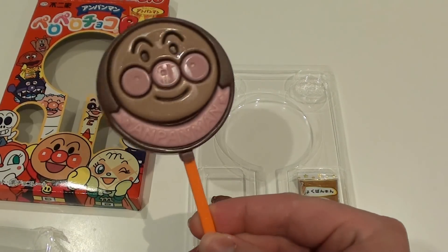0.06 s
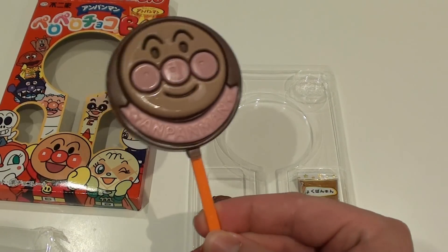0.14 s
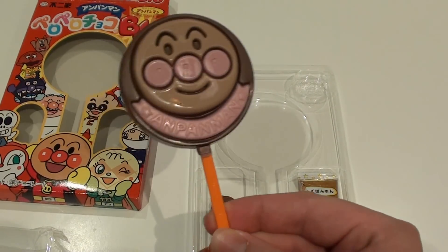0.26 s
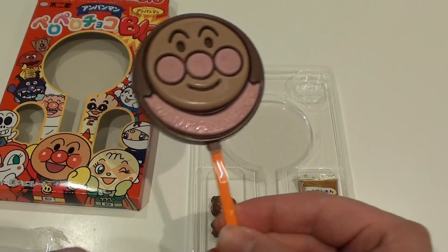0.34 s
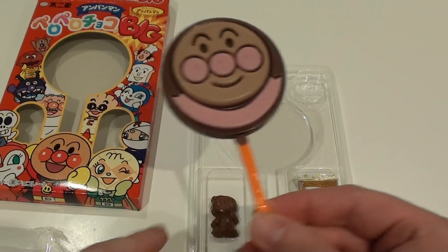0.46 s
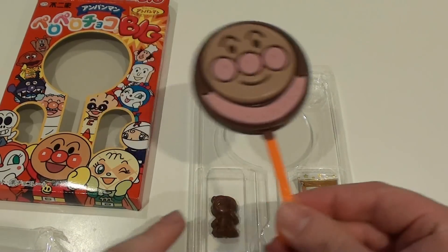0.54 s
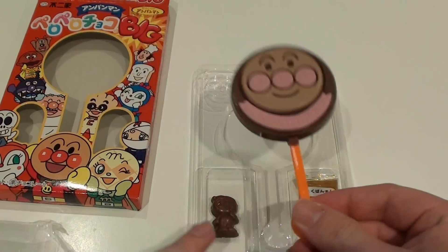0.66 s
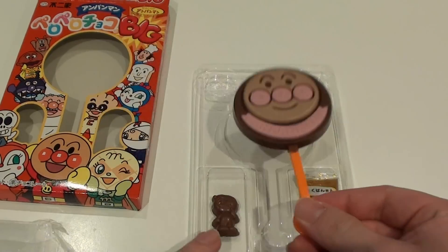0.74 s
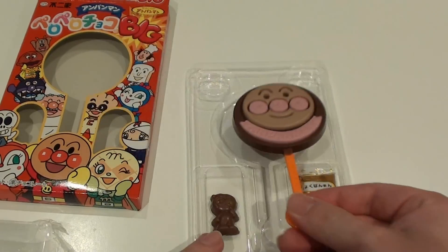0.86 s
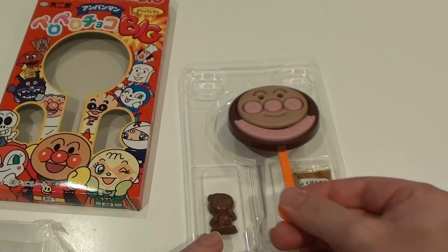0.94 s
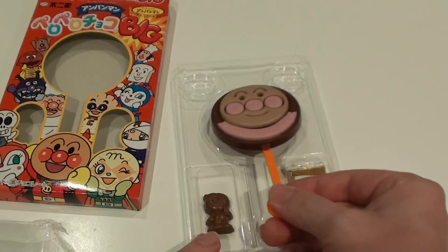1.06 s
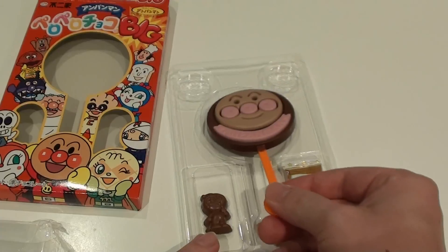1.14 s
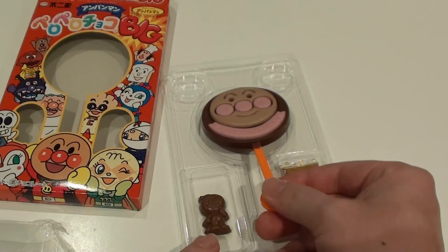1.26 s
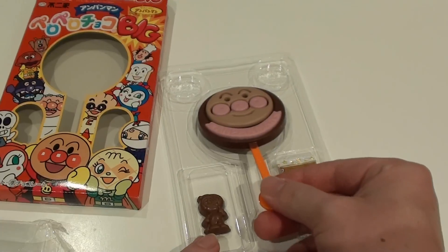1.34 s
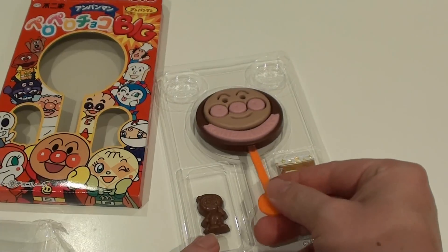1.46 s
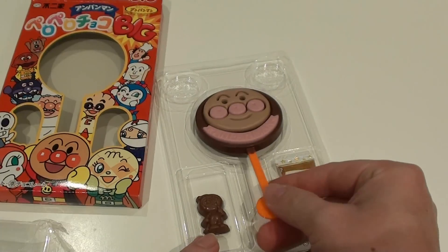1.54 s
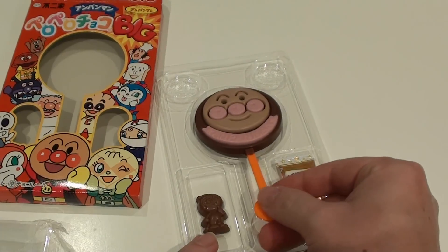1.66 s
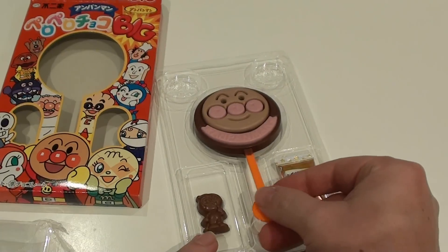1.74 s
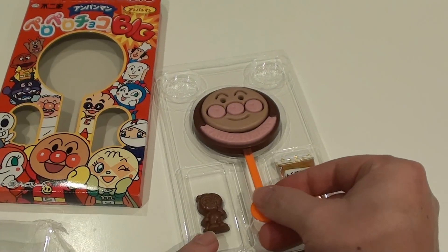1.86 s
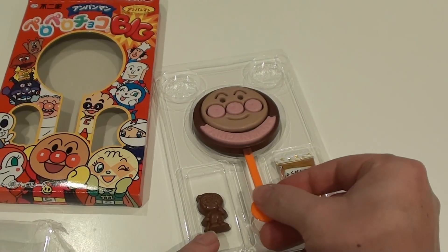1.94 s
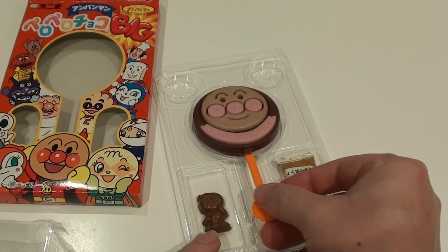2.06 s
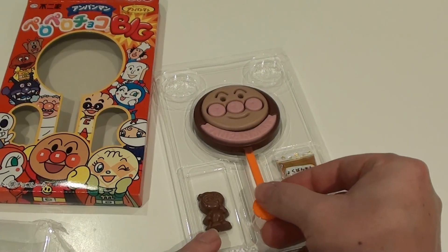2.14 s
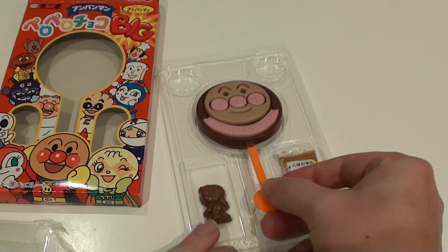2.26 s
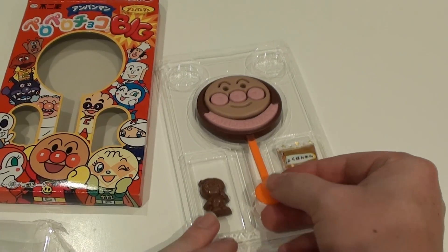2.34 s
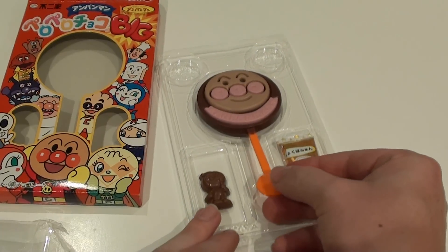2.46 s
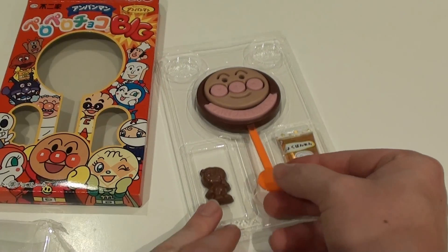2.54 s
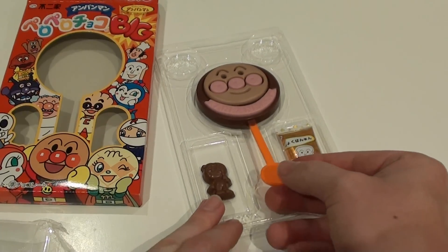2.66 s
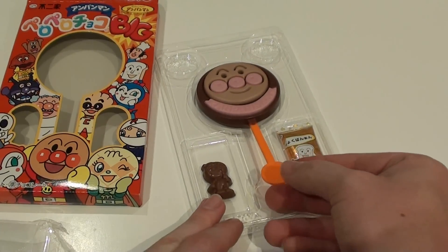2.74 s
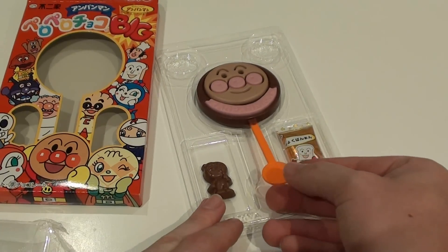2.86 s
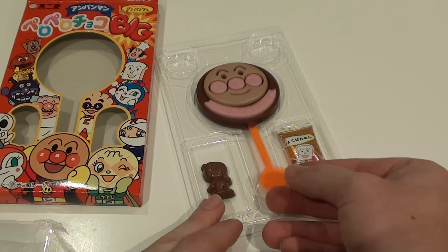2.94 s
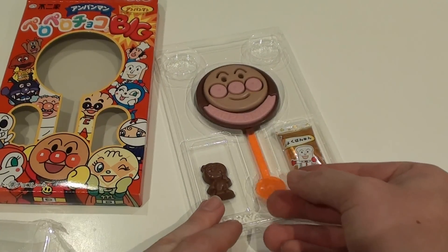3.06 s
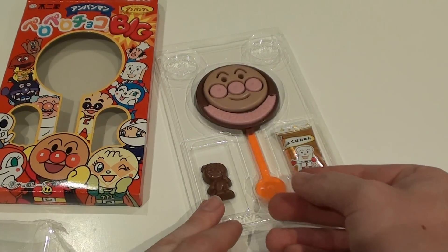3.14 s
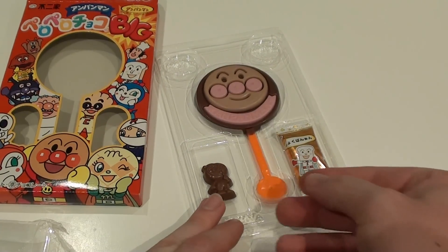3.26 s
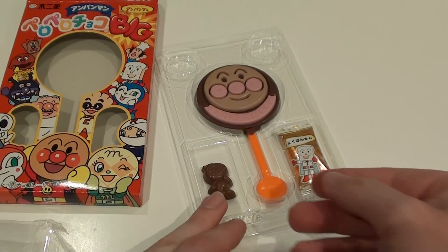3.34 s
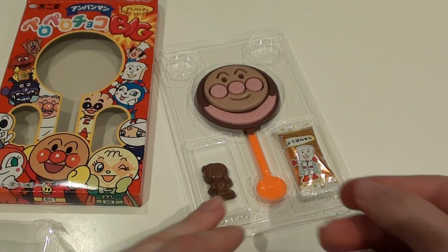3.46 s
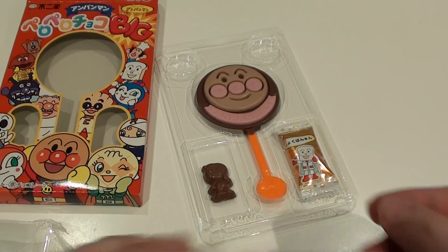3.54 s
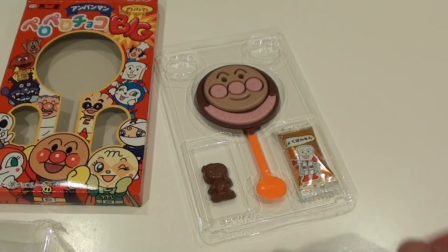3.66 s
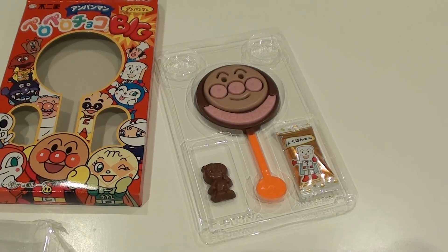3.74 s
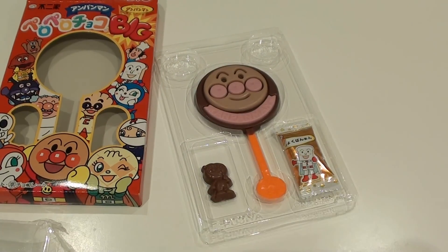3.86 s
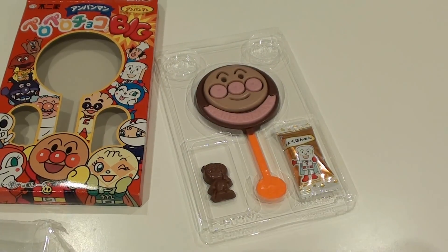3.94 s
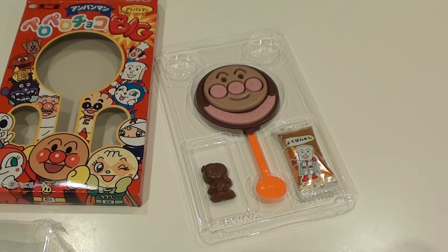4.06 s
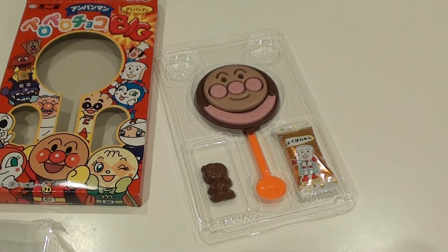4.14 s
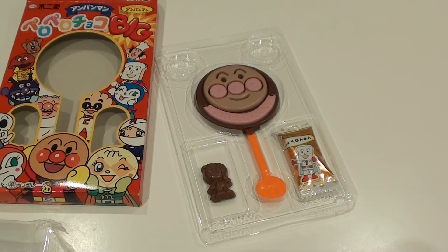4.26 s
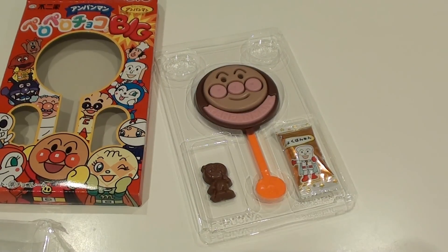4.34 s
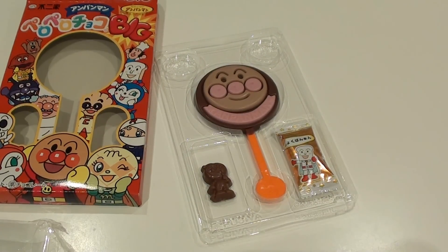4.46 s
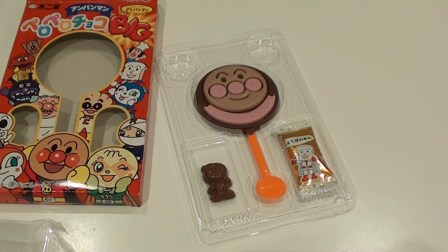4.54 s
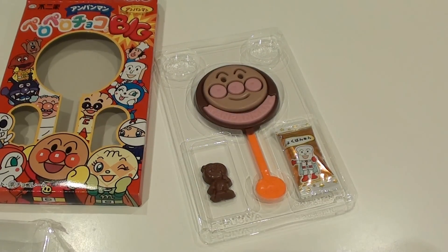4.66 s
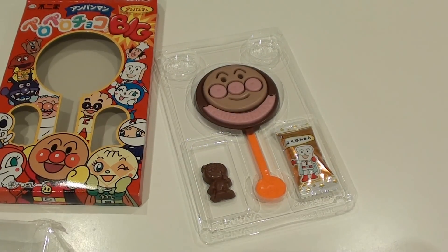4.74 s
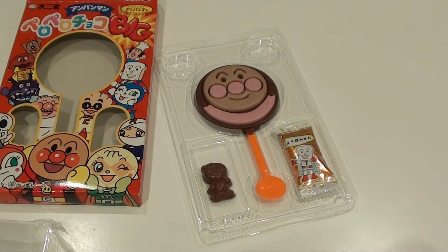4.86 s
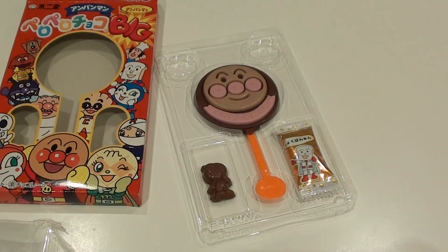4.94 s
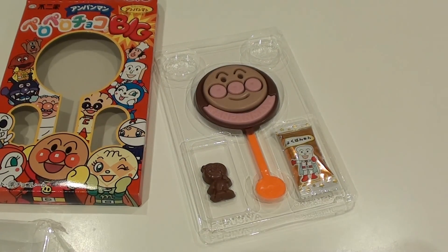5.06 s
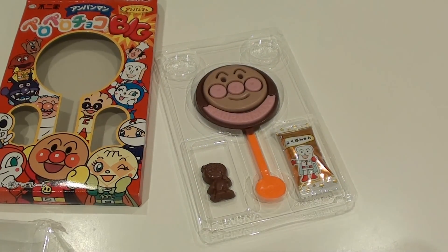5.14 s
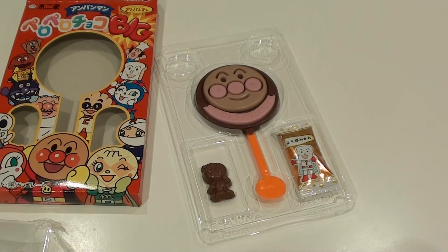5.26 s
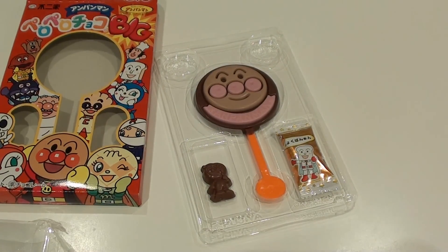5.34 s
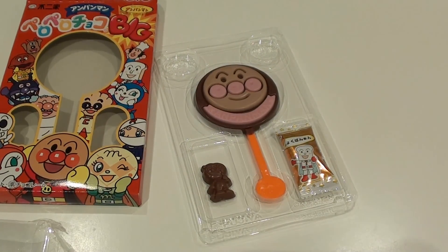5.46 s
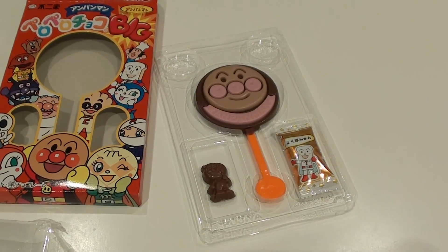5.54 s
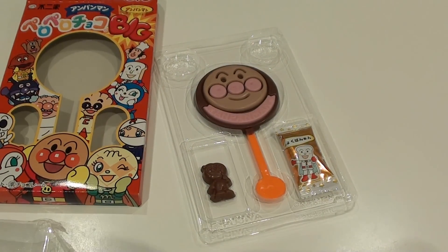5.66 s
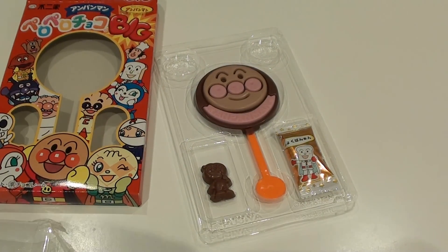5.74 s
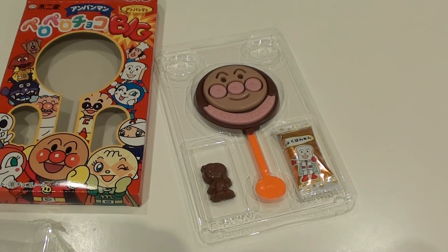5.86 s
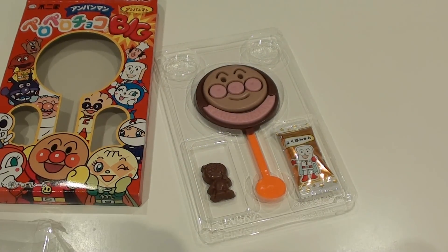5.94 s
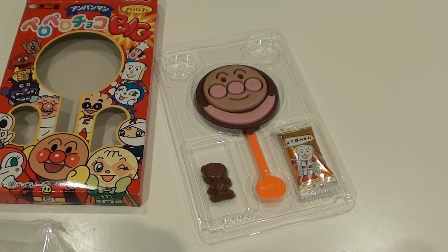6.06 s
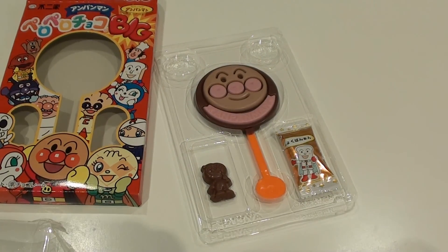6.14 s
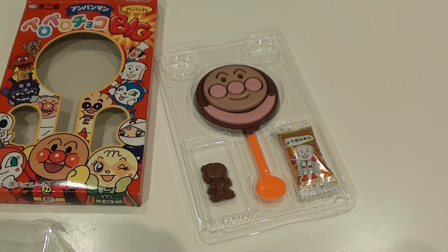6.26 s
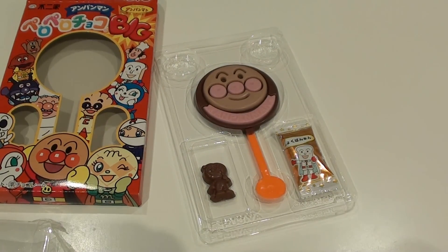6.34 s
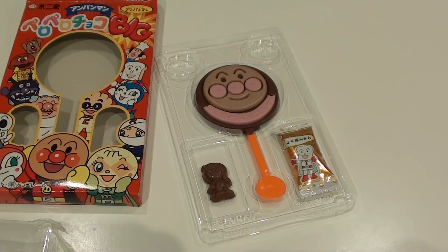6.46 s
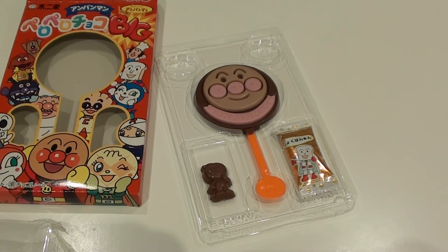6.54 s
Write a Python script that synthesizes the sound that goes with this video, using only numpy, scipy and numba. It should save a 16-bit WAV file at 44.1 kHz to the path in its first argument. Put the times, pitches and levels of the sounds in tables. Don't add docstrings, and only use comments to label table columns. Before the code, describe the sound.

A quiet, fairly dry room with low rumble, soft hiss and faint electronic whine, heard close in stereo. Nothing else until about 0.8 s, when light plastic ticks begin. From 1.0 to 1.55 s a lollipop settles into a thin tray: a dense flurry of hollow taps, bright crinkles, a crisp dimple pop near 1.06 and soft table bumps. Sparse taps and creaks continue to 2.2, with a sharper tick at 1.8. From 2.3 to 2.85 the tray rasps drily across the table. After a brief lull, the stick snaps into its groove at 3.1, loud and hard, with a hollow thud and a plastic rattle dying by about 3.5. A dull soft bump comes at 4.05, with faint cloth brushing until 4.7, strongest near 4.6. Then mostly hiss, with tiny ticks and two small hard knocks at 6.12 and 6.47, the second stronger.

```python
import sys
import numpy as np
from scipy import signal
from scipy.fft import rfft, irfft
from scipy.io import wavfile
from scipy.ndimage import uniform_filter1d
from numba import njit

SR = 44100
rng = np.random.default_rng(int(sys.argv[2]) if len(sys.argv) > 2 else 0)


def master(y):
    cut = np.clip(np.atleast_2d(y).T, -1, 1)
    pcm = np.round(cut * 32767)
    wavfile.write(sys.argv[1], SR, pcm.astype(np.int16))


def nominal_scale(level):
    x = np.asarray(level, float) / 20
    return 10 ** x


N = 291060

# hz, level_db_per_hz
AIR = [(15, -42), (25, -16.5), (70, -7), (82, -10.5), (102, 1), (127, -9.5), (153, -2), (293, -2.5),
       (317, -6), (659, -7.5), (1160, -10), (3820, -14), (4610, -14), (14800, -17), (15900, -18)]
# hz, side_minus_mid_db
AIR_SIDE = [(60, -17.5), (110, -15.5), (200, -13), (380, -1), (700, 0), (1290, 0.5), (2380, -11),
            (4400, -4.5), (8120, -9), (15000, -18.5)]
# hz, width_hz, level_db
WHINE = [(100, 27, -74.5), (4560, 380, -72), (5450, 300, -72), (6900, 250, -77), (7430, 250, -76)]
# time_s, level_db
HUSH = [(0, -58), (.6, -57.5), (1.5, -55), (3, -55), (3.8, -55.5), (5, -56), (6.6, -58)]
# hz, level_db, t60_s
BLOCK = [(1094, -0.5, 0.063), (1060, -18.5, 0.05), (1690, -10, 0.016), (2150, -12.5, 0.044),
         (2280, -14, 0.044), (2770, -4.5, 0.05), (3350, 1.5, 0.015), (3550, 6.5, 0.012), (3430, -16, 0.066),
         (3730, -25, 0.16), (4190, -22.5, .009), (4390, 4.5, 0.013), (4860, -8, 0.0099), (5270, -11, 0.016),
         (5770, 2.5, 0.0068), (6060, -3, 0.0081), (6800, -12, .015), (7900, -2.5, 0.0084),
         (10040, -18, 0.0063)]
# start_s, blow_db, bright_db_per_oct, ring_time_share, pitch_stretch
KNOCKS = [
    (6.121, -54, 2.5, .3, 1.2),
    (6.1229, -40.5, -4, 0.64, 1.03),
    (6.469, -31, 2, 0.91, 1.001),
]
# start_s, peak_db, pitch_hz, t60_s
BUMPS = [(1.035, -39.5, 189, 0.11), (1.149, -36, 186, 0.13), (1.84, -46, 178, 0.16),
         (1.239, -34.5, 190, 0.098), (1.24, -40.5, 480, .05), (1.263, -36.5, 275, 0.06),
         (1.315, -37.5, 207, 0.081), (1.35, -39, 205, 0.083), (1.40, -43, 195, .1), (1.625, -41, 186, 0.15),
         (3.405, -37, 195, 0.091), (4.047, -38, 290, 0.021), (4.0485, -42, 2400, .005),
         (4.048, -21, 480, 0.0055), (4.049, -19, 840, 0.0063), (4.0485, -31.5, 1670, 0.006),
         (4.74, -39, 300, 0.025)]
# time_s, level_db, dull_rel_db
SLEEVE = [
    (3.6, -85, 1),
    (4.024, -66.5, -1.5),
    (4.152, -63.5, 3.5),
    (4.41, -61.5, -2),
    (4.566, -54.5, -9),
    (4.628, -56, -11),
    (4.702, -76, -3),
    (5.0, -77, -4),
]
# hz, level_db, t60_s
CUP = [(186, -10.5, 0.24), (208, -30.5, 0.51), (254, -23, 0.14), (295, -19, 0.039), (347, -38.5, 0.53),
       (431, -34, 0.23), (494, -20.5, 0.16), (585, -12.5, 0.028), (670, -29, 0.097), (678, -28, 0.18),
       (775, -14, 0.09), (814, -15, 0.12), (860, -28, 0.15), (949, -3.5, 0.075), (990, -27, 0.37),
       (1027, -26, 0.4), (1025, -36, 0.16), (1156, -24.5, 0.18), (1060, -21, 0.095), (1225, -28, 0.21),
       (1337, -29, 0.26), (1400, -28.5, 0.14), (1535, -22.5, 0.26), (1567, -25, 0.25), (1600, -15, 0.0244),
       (1700, -31, 0.17), (2200, -16.5, 0.034), (1940, -47.5, .3)]
# start_s, blow_db, contact_ms, ring_time_share (fingers damp the rest)
SNAP = [
    (3.0991, -13, 0.057, 0.05),
    (3.1021, 7, 0.054, 0.017),
    (3.1042, -0.5, 0.21, 0.93),
]
# hz, width_hz, level_db, t60_s
SHIVER = [(198, 46, -37, 0.3), (352, 160, -28, 0.36), (780, 320, -27, 0.45), (1250, 730, -27.5, 0.54),
          (1950, 290, -32.5, 0.44), (4130, 2200, -40.5, 0.43), (7000, 3300, -44, 0.3)]
# hz, width_hz, level_db
TRAY = [(1250, 590, 1), (1850, 435, 2), (2400, 470, -1.5), (3190, 360, -9.5), (4100, 750, -18)]
EDGE = [(4250, 540, -18), (6250, 1600, 3.5), (7820, 1500, 2.5), (9200, 2800, -5), (11500, 2600, -19)]
TABLE = [(300, 41, 2), (520, 430, -3)]
# hz, width_hz, level_db
RASP = [(4170, 1000, 1.5), (6080, 870, 1), (7350, 1100, 0), (8480, 1300, -3.5), (10350, 2500, -11.5),
        (12800, 2500, -21)]
BODY_HZ = np.array([930, 1140, 1240, 1350, 1460, 1560, 1750, 1850, 1970, 2250, 2550, 3200])
EDGE_HZ = np.array([3400, 4400, 4900, 5300, 5700, 6200, 6550, 7100, 7700, 8200, 9600, 10400])
# start_s, held_s, level_db, bright_db
PRESSES = [(.82, 0.041, -60, 5), (.865, 0.056, -49.5, -2.5), (.93, 0.051, -53.5, -6),
           (1.001, 0.065, -48, -2), (1.069, 0.055, -48, 2.5), (1.133, 0.0083, -42.5, -6),
           (1.151, 0.005, -38.5, -7), (1.165, 0.044, -45, -5.5), (1.217, 0.0094, -43.5, -9),
           (1.24, 0.011, -39.5, -11), (1.2697, 0.022, -41.5, -4.5), (1.303, 0.019, -40.5, -3.5),
           (1.335, 0.054, -46, -9), (1.408, 0.008, -45.5, -3), (1.421, 0.016, -42.5, -5),
           (1.447, 0.019, -49.5, -20), (1.468, 0.0042, -42, -1.5), (1.484, 0.025, -44.5, -2.5),
           (1.52, 0.026, -46.5, -5), (1.538, 0.0031, -41.5, -2), (1.55, 0.073, -58, -3),
           (1.673, .004, -49.5, -12), (1.804, 0.005, -45, -0.5), (1.862, 0.033, -53, -8),
           (2.036, 0.048, -49.5, -10), (2.096, 0.028, -56, -12), (2.167, 0.066, -53, -12),
           (3.067, 0.0098, -48, -8), (3.0864, 0.019, -38.5, -8), (3.24, .15, -70, -11),
           (3.3, 0.079, -52, -3), (3.402, 0.005, -48.5, -1), ]
# time_s, level_db, bright_db
SLIDE = [(2.25, -62, -11), (2.31, -43.5, -5.5), (2.35, -43, -1.5), (2.41, -40.5, -6.5), (2.48, -44.5, -3.5),
         (2.548, -46, -5.5), (2.65, -46, -5.5), (2.722, -46.5, -6), (2.798, -49.5, -8), (2.868, -65, -10),
         (2.9, -72, -8)]
# start_s, peak_db, pitch_hz, t60_s
TAPS = [(0.802, -46, 2770, 0.019), (0.826, -41, 2800, 0.011), (0.832, -46, 2540, .016),
        (0.8425, -39.5, 2400, 0.018), (0.862, -40, 1210, .025), (0.888, -45, 1550, 0.038),
        (0.905, -43, 1750, .03), (0.9931, -28.5, 2030, .016), (0.998, -40, 3000, .01),
        (1.001, -33, 2380, .015), (1.026, -33, 1880, 0.0099), (1.034, -38, 1500, .02),
        (1.045, -38, 1750, .02), (1.0658, -38, 1700, 0.01), (1.0713, -34, 2470, .012),
        (1.079, -37, 2400, .012), (1.098, -36, 2280, .012), (1.1342, -31, 1850, .025),
        (1.1504, -28.5, 1850, 0.04), (1.19, -34, 1270, 0.017), (1.198, -29.5, 1890, 0.013),
        (1.2164, -32, 1246, 0.034), (1.2395, -30.5, 1300, 0.014), (1.2432, -50, 1490, 0.031),
        (1.2706, -33, 2030, .02), (1.276, -40, 1470, 0.018), (1.289, -40, 1650, 0.028),
        (1.3148, -39, 1760, .02), (1.322, -31, 1690, 0.018), (1.3534, -34, 1960, 0.022),
        (1.4106, -37, 1320, .02), (1.4236, -30, 1700, 0.03), (1.4356, -30, 1490, 0.021),
        (1.438, -32, 2090, 0.016), (1.4705, -34, 1790, .015), (1.482, -34, 1490, .02),
        (1.487, -34, 2120, 0.022), (1.497, -37, 1800, .025), (1.507, -29.5, 1660, .015),
        (1.5092, -33, 2200, 0.018), (1.513, -36, 1290, .015), (1.524, -37, 1490, 0.023),
        (1.5391, -29, 1940, 0.031), (1.551, -45, 1400, .015),
        (1.62, -41, 1490, .008), (1.6725, -35.5, 1850, 0.012), (1.829, -45, 1700, 0.02),
           (1.8097, -36, 1800, 0.01), (1.8147, -37, 1450, 0.012), (1.842, -45, 1750, 0.02),
           (1.875, -37.5, 1200, 0.013), (1.887, -41, 1450, .016), (1.9964, -42, 1290, .013),
           (2.0148, -43, 1150, 0.029), (2.0373, -38, 1190, 0.017), (2.0468, -39, 1140, 0.015),
           (2.0466, -34, 1950, 0.0069), (2.0556, -35.5, 1180, 0.014), (2.056, -35.5, 2160, 0.0094),
           (2.0635, -38, 1190, 0.015), (2.0957, -36.5, 1230, 0.016), (2.107, -37, 1250, 0.013),
           (2.1414, -44, 1250, .013), (2.149, -44, 1470, 0.014), (2.1868, -47, 1820, 0.011),
           (2.191, -39.5, 1250, .015)]
# start_s, peak_db, pitch_hz, t60_s, left_minus_right_db
ROCKING = [(3.021, -47, 2090, 0.014, 0), (3.0705, -36, 2260, .02, -2), (3.0986, -16, 1250, 0.012, 3),
           (3.1023, -15, 1200, 0.011, -0.5), (3.1115, -21, 925, 0.022, .5),
           (3.116, -23.5, 1890, 0.014, -1.5), (3.1265, -25, 1050, 0.015, 2), (3.128, -28, 1600, .02, 0),
           (3.1328, -16, 890, .018, -2), (3.14, -26, 1950, 0.046, 2.5), (3.155, -23, 1150, .02, -0.5),
           (3.161, -19.5, 900, 0.02, 0), (3.22, -39, 1890, 0.028, 4), (3.237, -47, 1060, 0.027, 3),
           (3.3, -47, 1880, .02, 0), (3.3065, -38, 1000, 0.027, .5), (3.357, -48, 1400, .03, 2),
           (3.4012, -36.5, 1650, 0.01, 3), (3.4014, -38, 2400, .01, 0), (3.1775, -30, 1100, .02, .5),
           (3.193, -28, 990, 0.023, .5), (3.201, -33, 990, 0.023, 4), (3.224, -37, 790, 0.022, .5)]
# start_s, peak_db, pitch_hz
CREASES = [(0.802, -39.5, 6700), (0.837, -38, 6840), (0.84, -41, 6560), (0.843, -37, 8130),
           (0.9296, -47, 6310), (0.993, -33.5, 5100), (0.998, -35, 5680), (1.0195, -40, 6500),
           (1.0238, -32, 7150), (1.026, -30.5, 6440), (1.0288, -33, 7130), (1.0351, -35, 6070),
           (1.069, -37, 6200), (1.0605, -37, 13900), (1.0721, -32, 6350), (1.079, -31, 6240),
           (1.0906, -31, 7200), (1.091, -44, 11400), (1.098, -31, 6400), (1.106, -37, 6550),
           (1.1337, -38, 6550), (1.1507, -33.5, 8160), (1.16, -37, 8150), (1.1795, -37, 7900),
           (1.189, -43, 4180), (1.217, -37, 6070),
           (1.239, -33, 8000), (1.246, -44, 4630), (1.2702, -35, 7000), (1.2703, -37, 9300),
           (1.2753, -38, 5900), (1.314, -38, 6900), (1.321, -38, 4050), (1.3255, -37, 6800),
           (1.3536, -42, 6000), (1.359, -43, 7500), (1.369, -45, 6900), (1.4102, -53, 6500),
           (1.4239, -38, 8120), (1.4275, -37, 7600), (1.435, -38, 6800), (1.434, -35, 4100),
           (1.4715, -32, 7750), (1.471, -38, 4600), (1.485, -31, 7900), (1.496, -41, 4500),
           (1.5057, -42, 6550), (1.5393, -32, 6600), (1.541, -28, 8530), (1.54, -42, 11500),
           (1.5428, -33, 6760), (1.671, -43, 6550), (1.8035, -33, 8600), (1.8052, -31, 6460),
           (1.8055, -41, 10200), (1.806, -40, 7700), (1.807, -36.5, 4390), (2.0359, -42.5, 6800),
           (3.0672, -46, 5600), (3.086, -36, 7500), (3.092, -37, 7450), (3.0987, -20.5, 6840),
            (3.0987, -23.5, 5500), (3.1023, -29.5, 4900), (3.1035, -22, 3850), (3.131, -34, 5000),
            (3.1385, -27.5, 5850), (3.139, -33, 7000), (3.1315, -38, 7440), (3.1594, -39, 3900),
            (3.1997, -44, 4390), (3.4018, -39, 5900), (3.4018, -38, 7300), (3.4009, -48, 11000),
            (4.6797, -47, 5900), (5.5, -46, 4600), (6.1235, -39, 5600), (6.1233, -49, 3450),
            (4.68, -45, 5000), (1.824, -46, 4500)]
# start_s, level_db
POP = (1.0604, -10)
# hz, level_db, t60_s
DIMPLE = [(2050, -17, .006), (2550, -5.5, 0.012), (3250, -12, .009), (4450, -11, .008), (5300, -8, 0.0091),
          (6200, -5, 0.0083), (6550, 4, .0035), (7760, -15, .007), (8600, -17, .006), (9650, -26, 0.0098),
          (10400, -30, .005), (13400, -24, .003)]
TICK_S = [1.0905, 1.2389, 1.2699, 1.27, 1.27, 1.3532, 1.8036, 1.8036, 1.8036, 1.8036, 3.0986, 3.1025,
          3.2005, 3.2365, 3.4016]
# peak_db, pitch_hz, t60_s
TICKS = [(-24, 6700, .005), (-24, 1500, .003), (-19.5, 7900, .0022), (-28, 2400, .004), (-34, 11500, .0015),
         (-28, 7200, .002), (-35, 1562, .045), (-35, 1730, .045), (-36, 1910, .04), (-43, 1316, .045),
         (-20, 2400, .005), (-10, 1600, .004), (-31, 1550, .03), (-35, 1000, .02), (-27, 6600, .003)]

WHINE_FLICKER_DB, WHINE_FLICKER_S = 3, .02
ROOM_T60_S, ROOM_DB, ROOM_HZ = .18, -26, 4000
RATTLE_DB, RATTLE_S, SHIVER_SIDE_DB, SHIVER_RISE_S = 1.8, .006, -12.5, .011
PRESS_DB_PER_S, RELEASE_DB_PER_S = 6000, 1100
THROUGH_TABLE_DB, SLIDE_TABLE_DB = -13.5, -19.5
TAP_PAN_DB_PER_OCT = -1
CREASE_T60_S, RELAX_T60_S = .0075, .007
FLIP_DB, FLIP_HZ = -4, 7000
POP_RISE_MS = .16
LOW_CUT_HZ, TOP_HZ = 193, 15760
OPPOSITE = np.array([[1], [-1]])


@njit
def svf(x, hz, width_hz):
    y, band, low = np.empty(len(x)), 0., 0.
    g, k = np.tan(np.pi * hz / SR), width_hz / hz
    for i in range(len(x)):
        v = (band + g * (x[i] - low)) / (1 + g * (g + k))
        band, low, y[i] = 2 * v - band, low + 2 * g * v, k * v
    return y


def unit(x):
    return x / np.sqrt(np.mean(x ** 2))


def curve(time_s, level_db):
    return nominal_scale(np.interp(np.arange(N) / SR, time_s, level_db, left=-120, right=-120))


def flicker(count, hold_s):
    hold = int(hold_s * SR)
    smooth = uniform_filter1d(rng.standard_normal(count), hold)
    return unit(uniform_filter1d(smooth, hold))


def shaped(points):
    hz, level_db = np.transpose(points)
    bin_hz = np.arange(1, N // 2 + 2) * SR / N
    gain = nominal_scale(np.interp(np.log(bin_hz), np.log(hz), level_db))
    return irfft(rfft(rng.standard_normal(N)) * gain, N)


def body(x, peaks):
    total = 0
    for k, (hz, width_hz, db) in enumerate(peaks):
        centre_hz, stage_hz = 1. * hz, 1.53 * width_hz
        steep = svf(svf(x, centre_hz, stage_hz), centre_hz, stage_hz)
        total = total + (-1) ** k * nominal_scale(db) * steep
    return unit(total)


def ring(modes, length_s=0.53, rise_cycles=0.92):
    t = np.arange(int(length_s * SR)) / SR
    total = 0
    for hz, db, t60_s in modes:
        swell = (1 - np.exp(-t * hz / rise_cycles)) ** 2
        total = total + swell * nominal_scale(db - 60 * t / max(t60_s, .002)) * np.sin(2 * np.pi * hz * t)
    return total


def add(out, start_s, x, pan_db=0.):
    i = int(start_s * SR)
    x = x[..., :N - i]
    out[:, i:i + x.shape[-1]] += x * nominal_scale(OPPOSITE * pan_db / 2)


def air():
    mid = shaped(AIR)
    hz, side_db = np.transpose(AIR_SIDE)
    side = shaped([(f, db + np.interp(np.log(f), np.log(hz), side_db)) for f, db in AIR])
    hush = curve(*np.transpose(HUSH)) / mid.std()
    whine = 0
    for hz, width_hz, db in WHINE:
        if hz > WHINE[0][0]:
            db = db + WHINE_FLICKER_DB * flicker(N, WHINE_FLICKER_S)
        whine = whine + nominal_scale(db) * body(rng.standard_normal(N), [(hz, width_hz, 0)])
    return hush * (mid + (side + 0.019 * mid) * OPPOSITE) + whine


def room(x):
    t = np.arange(SR // 2) / SR
    tail = rng.standard_normal((3, len(t))) * nominal_scale(-60 * t / ROOM_T60_S) * (t > .003)
    tail = tail[0] + .5 * tail[1:]
    tail = signal.lfilter(*signal.butter(1, ROOM_HZ, fs=SR), tail)
    tail = tail / np.sqrt((tail ** 2).sum(1, keepdims=True))
    return nominal_scale(ROOM_DB) * signal.fftconvolve(x, tail, axes=1)[:, :N]


def sleeve():
    time_s, fine_db, dull_db = np.transpose(SLEEVE)
    fine = body(rng.standard_normal(N), [(7900, 4000, 0)])
    dull = body(rng.standard_normal(N), [(2800, 5600, 0)])
    return curve(time_s, fine_db) * fine + curve(time_s, fine_db + dull_db + 4.5) * dull * nominal_scale(1.5 * OPPOSITE)


def bumps(out):
    for s, db, hz, t60_s in BUMPS:
        add(out, s, nominal_scale(db) * ring([(hz, 0, t60_s)], .3))


def knocks(out):
    for s, db, bright_db, share, stretch in KNOCKS:
        modes = [(hz * stretch, g + bright_db * np.log2(hz / BLOCK[0][0]), t60_s * share)
                 for hz, g, t60_s in BLOCK]
        add(out, s, nominal_scale(db) * ring(modes, .2, rise_cycles=1.0), .7)


def nearby():
    out = sleeve()
    bumps(out)
    knocks(out)
    return out


def grit(per_s, scatter_db):
    hit, size = rng.random((2, N))
    size_db = np.minimum(-scatter_db * np.log(size + 1e-9), 13)
    return (hit < per_s / SR) * nominal_scale(size_db) * rng.choice([-1., 1.], N)


def pressure():
    t = np.arange(0, N, 16) / SR
    power = 0
    for s, held_s, db, bright_db in PRESSES:
        rise_db = np.minimum(t - s, 0) * PRESS_DB_PER_S
        release_db = np.maximum(t - s - held_s, 0) * RELEASE_DB_PER_S
        part_db = np.array([[0], [bright_db], [THROUGH_TABLE_DB]])
        power = power + nominal_scale(db + rise_db - release_db + part_db) ** 2
    return [np.interp(np.arange(N) / SR, t, gain) for gain in np.sqrt(power)]


def drag():
    t = np.arange(N) / SR
    sliding = (t > SLIDE[0][0]) & (t < SLIDE[-1][0])
    slips = np.where(sliding, unit(grit(12000, 1.1)), unit(grit(5500, 1.5)))
    hollow = body(slips, TRAY)
    edge = body(slips + 0.61 * unit(grit(6000, 1.5)), EDGE)
    wood = body(slips, TABLE)
    time_s, slide_db, bright_db = np.transpose(SLIDE)
    rim = curve(time_s, slide_db + bright_db) * body(np.roll(slips, 900), RASP)
    scrape = body(slips[::-1], RASP[:1])
    slide = curve(time_s, slide_db)
    press, bright, press_table = pressure()
    force = np.hypot(slide, press)
    low = np.hypot(slide * nominal_scale(SLIDE_TABLE_DB), press_table)
    x = rim + nominal_scale(-1.0) * force * hollow + nominal_scale(-3.0) * low * wood
    x = x + bright * (nominal_scale(-9.0) * scrape + nominal_scale(-4.5) * edge)
    wide = nominal_scale(-14) * np.roll(x, 37)
    return (x + wide * OPPOSITE) * nominal_scale(.25 * OPPOSITE)


def cluster(hz, t60_s, shared_hz, fall_db, crack_db, chance):
    near, burst = chance[:len(shared_hz)], chance[len(shared_hz):]
    octaves = np.abs(np.log2(shared_hz / hz))
    mode_db = -3.5 - fall_db * octaves + 6.5 * near[::-1]
    modes = zip(shared_hz * (1 + 0.02 * near), mode_db, t60_s / (0.96 + 0.56 * octaves))
    x = ring([(hz, 0, t60_s), *modes], .1)
    x /= np.abs(x).max()
    fade = nominal_scale(-60 * np.arange(len(burst)) * hz / SR / 18)
    crack = svf(svf(burst * fade, 1.07 * hz, 1.36 * hz), hz, 2.6 * hz)
    x[:len(burst)] += nominal_scale(crack_db) * crack
    return x / np.abs(x).max()


def taps(out):
    panned = [(s, db, hz, t60_s, TAP_PAN_DB_PER_OCT * np.log2(hz / 1500))
              for s, db, hz, t60_s in TAPS]
    for s, db, hz, t60_s, pan_db in panned + ROCKING:
        patch = cluster(hz, t60_s, BODY_HZ, 23.0, -1.4, rng.standard_normal(500))
        add(out, s, nominal_scale(db) * patch, pan_db)


def creases(out):
    flip = np.diff(np.hanning(int(SR / FLIP_HZ) + 2))
    flip = flip / flip.max()
    for s, db, hz in CREASES:
        t60_s = CREASE_T60_S if s < 3 else RELAX_T60_S
        add(out, s, nominal_scale(db) * cluster(hz, t60_s, EDGE_HZ, 21.5, -2.2, rng.standard_normal(200)))
        add(out, s, nominal_scale(db + FLIP_DB) * flip)


def dimple(out):
    start_s, level_db = POP
    pop = sum(ring([mode], .05, mode[0] * POP_RISE_MS / 1000) for mode in DIMPLE)
    add(out, start_s, nominal_scale(level_db) * pop)


def ticks(out):
    for s, (db, hz, t60_s) in zip(TICK_S, TICKS):
        add(out, s, nominal_scale(db) * ring([(hz, 0, t60_s)], .1, rise_cycles=.4))


def tray():
    out = drag()
    taps(out)
    creases(out)
    dimple(out)
    ticks(out)
    return out


def shiver(out):
    t = np.arange(SR) / SR
    fits_db = RATTLE_DB * flicker(SR, RATTLE_S)
    for hz, width_hz, db, t60_s in SHIVER:
        mid, side = (body(svf(noise, 1. * hz, 1.13 * width_hz), [(hz, width_hz, 0)])
                     for noise in rng.standard_normal((2, SR)))
        shake = mid + nominal_scale(SHIVER_SIDE_DB) * side * OPPOSITE
        swell = 1 - np.exp(-t / SHIVER_RISE_S)
        add(out, SNAP[1][0], nominal_scale(db - 60 * t / t60_s + fits_db) * swell * shake)


def snap():
    out = np.zeros((2, N))
    for s, db, contact_ms, share in SNAP:
        push = np.hanning(int(contact_ms * SR / 1000) * 2 + 3)
        cup = ring([(hz, g, t60_s * share) for hz, g, t60_s in CUP], rise_cycles=0.34)
        add(out, s, -nominal_scale(db) * np.convolve(cup, push / push.sum()), .6)
    shiver(out)
    return out


def scene():
    low_cut = signal.butter(6, LOW_CUT_HZ, "high", fs=SR, output="sos")
    near = signal.sosfilt(low_cut, nearby() + tray() + snap())
    return air() + room(near) + near


def band_limit(x):
    return signal.sosfilt(signal.butter(12, 16480, fs=SR, output="sos"), x)


def record(dry):
    top_cut = signal.ellip(10, .2, 60, TOP_HZ, fs=SR, output="sos")
    mix = signal.sosfilt(top_cut, dry)
    return band_limit(mix)


dry = scene()
out = record(dry)
master(out)
```